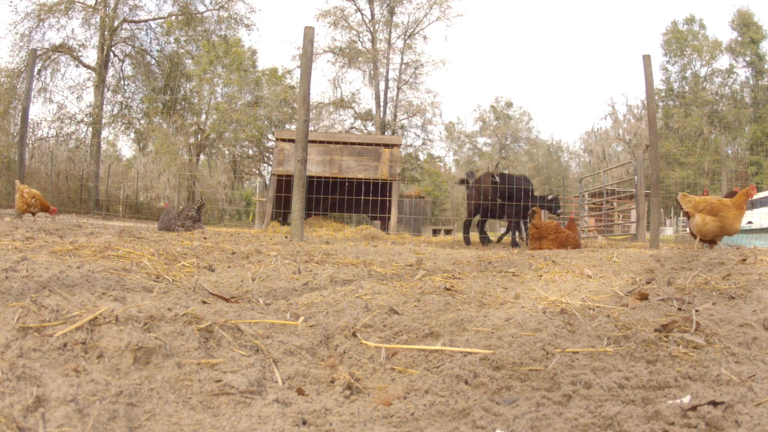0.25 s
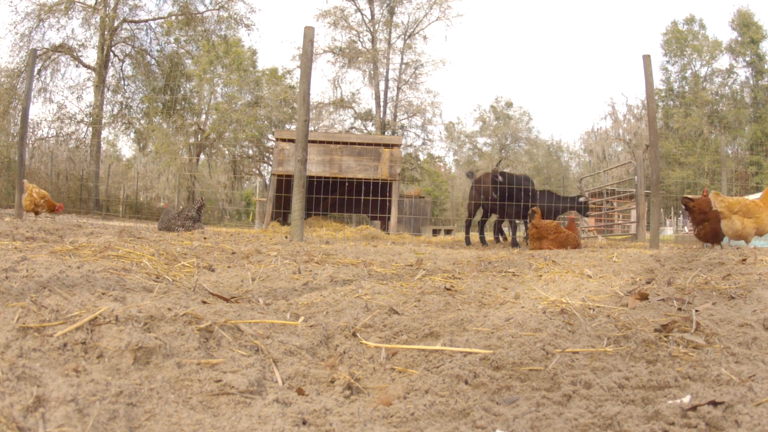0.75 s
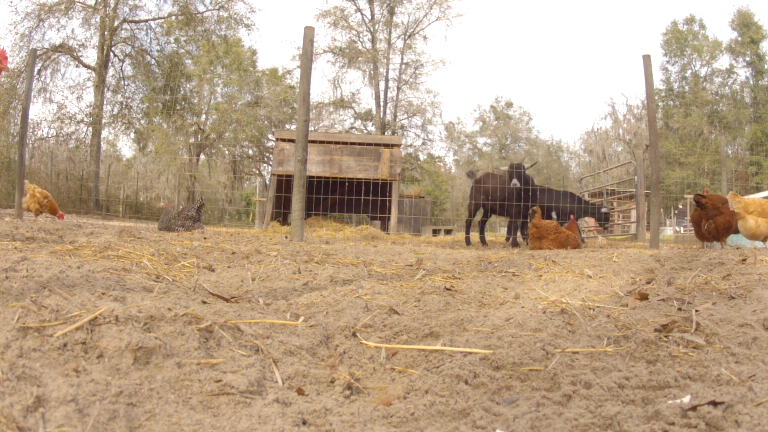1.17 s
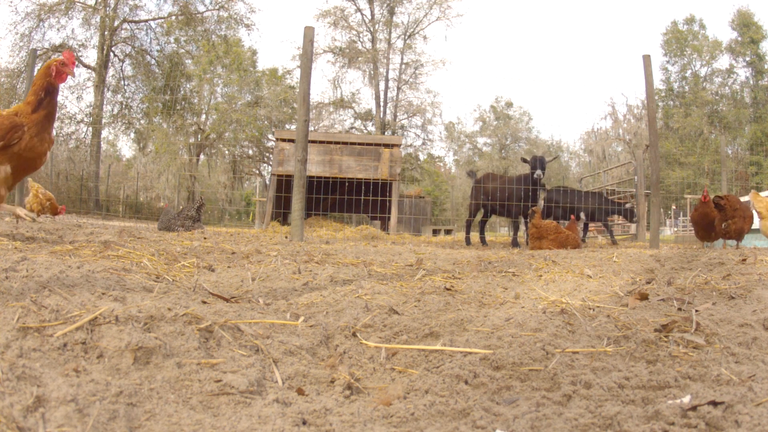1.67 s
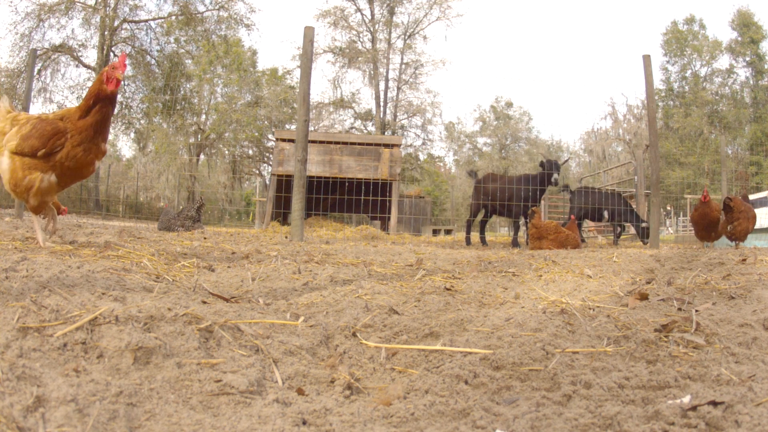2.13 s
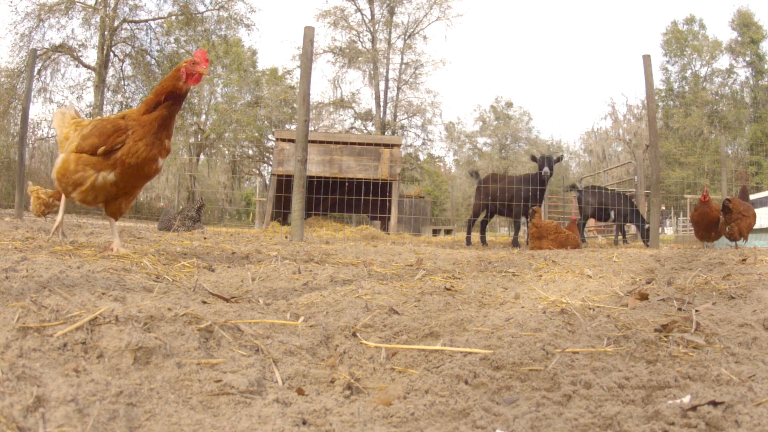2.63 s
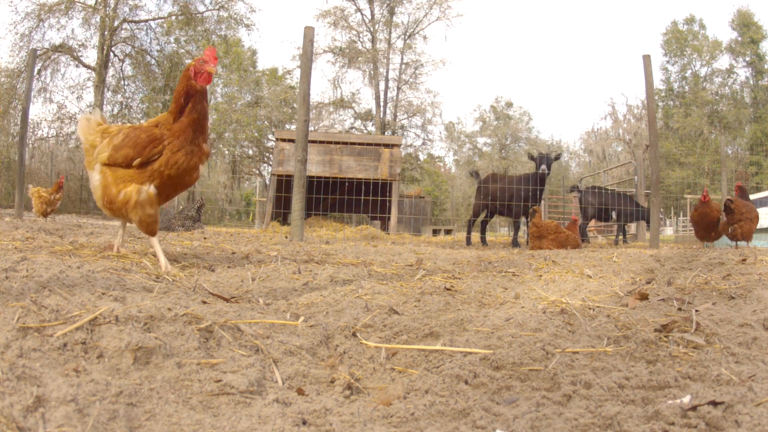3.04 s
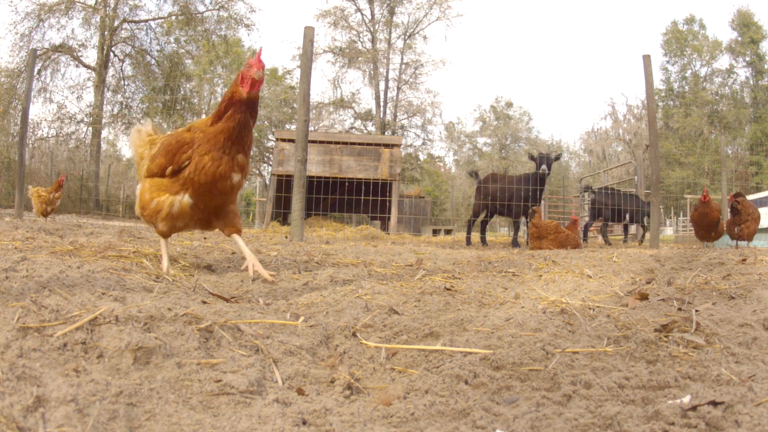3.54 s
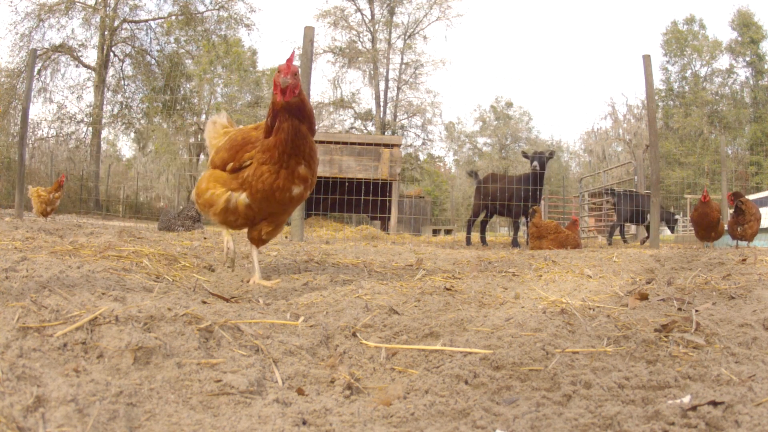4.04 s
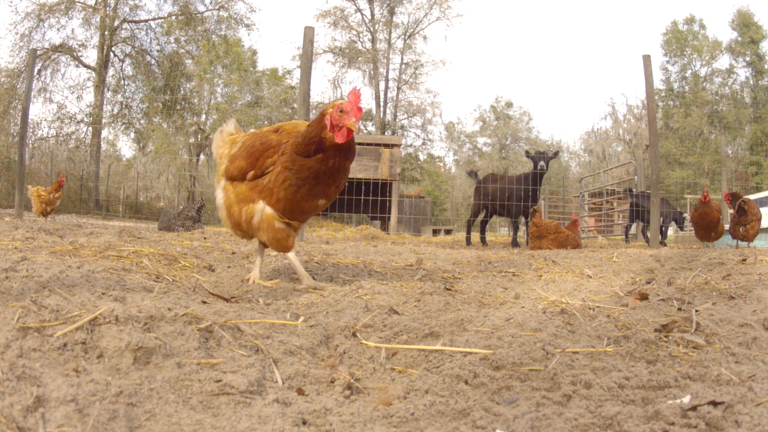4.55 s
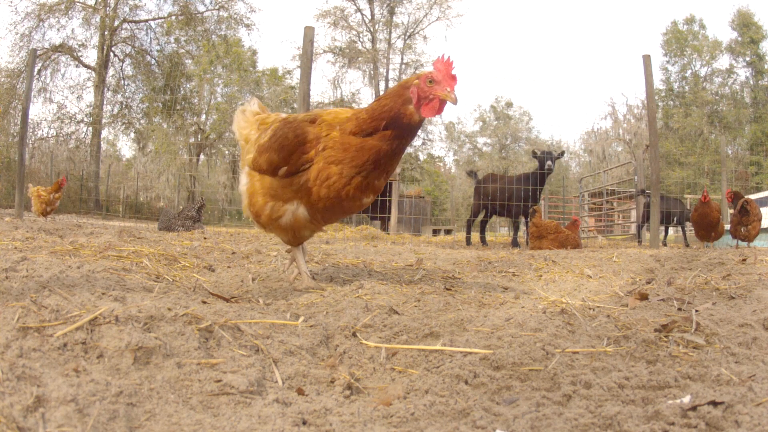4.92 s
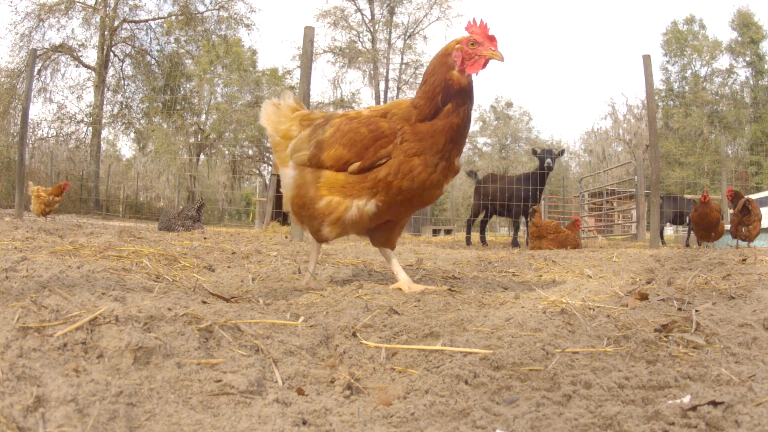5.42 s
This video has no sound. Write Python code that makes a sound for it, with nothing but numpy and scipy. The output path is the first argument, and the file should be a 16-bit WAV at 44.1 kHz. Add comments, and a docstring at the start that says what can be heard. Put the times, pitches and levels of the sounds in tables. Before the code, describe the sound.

In a farmyard, a hen draws out a raspy call, clucks several times and ends with hoarse, drawn-out croaks.

```python
"""A farmyard, where a hen gives one long rasping call, a run of short clucks, then longer croaks.
Air shakes her voice box, which slips between a clean tone, a growl (every second pulse differs) and
a chaotic rasp; her throat and beak shape the sound. Thin whines lead into some of the early calls.
Sheds and trees echo faintly over a low outdoor rumble. The recorder keeps only a narrow band and
holds each sample, which adds a thin metallic fizz."""
import sys
import numpy as np
from scipy import signal
from scipy.fft import rfft, irfft, next_fast_len
from scipy.io import wavfile
from scipy.ndimage import uniform_filter1d

SR = 44100
rng = np.random.default_rng(int(sys.argv[2]) if len(sys.argv) > 2 else 0)


def waveform_to_disk(signal):
    """Save audio, clipped to [-1, 1], as 16-bit WAV at the path in sys.argv[1]."""
    frames = np.transpose(np.atleast_2d(signal))
    scaled = np.clip(frames, -1, 1) * 32767
    samples = np.round(scaled).astype(np.int16)
    wavfile.write(sys.argv[1], SR, samples)


N = 250929


def gain_of(db):
    """Turns decibels into a number to multiply by."""
    return 10 ** (np.asarray(db) / 20)


def evened(x):
    """Scales a signal so that its average size (rms) is one."""
    return x / np.sqrt(np.mean(x ** 2) + 1e-20)


def read_curve(points, hz):
    """Reads between the rows of a (frequency, value) table, with octaves evenly spaced."""
    f, value = np.transpose(points)
    return np.interp(np.log(hz + 1), np.log(f + 1), value)


def add(mix, start, sound):
    """Lays a sound into the mix at a start time in seconds."""
    part = mix[max(round(start * SR), 0):][:len(sound)]
    part += sound[:len(part)]


def wander(size, rate_hz):
    """A smooth random wobble of average size one that moves up to about the given rate."""
    padded = next_fast_len(size + SR // 4)
    hz = np.fft.rfftfreq(padded, 1 / SR)
    spectrum = rfft(rng.standard_normal(padded)) / (1 + (hz / rate_hz) ** 4)
    return evened(irfft(spectrum, padded))[:size]


def colour(x, points, size=4096):
    """Shapes the tone by a (f/Hz, level/dB) curve; the filter rings only after a sound, not before."""
    log_gain = np.log(gain_of(read_curve(points, abs(np.fft.fftfreq(size, 1 / SR)))))
    taps = np.fft.ifft(np.exp(np.conj(signal.hilbert(log_gain)))).real
    return signal.fftconvolve(x, taps[:size // 2])[:len(x)]


def resonate(x, hz, width_hz):
    """A resonance with steep sides: lets through one band of frequencies."""
    edges = [hz - width_hz / 2, hz + width_hz / 2]
    return signal.sosfilt(signal.butter(3, edges, "band", fs=SR, output="sos"), x)


def strength(x, size):
    """How strong a signal is from moment to moment (running rms)."""
    return np.sqrt(abs(uniform_filter1d(uniform_filter1d(x ** 2, size), size)) + 1e-12)


def bumps(events, t, length_s):
    """A smooth hump centred on each (time, height) event."""
    return sum(height * np.cos(np.pi * np.clip((t - s) / length_s, -.5, .5)) ** 2 for s, height in events)


def yard(air_db=-57.42, swell_db=0.82, hum_hz=103, hum_db=-66):
    """Distant rumble and air that swell gently, with a low wavering hum."""
    # the tone of the yard's background: f/Hz, relative level/dB
    rumble_curve = [(12, -95), (20, -14), (59, -11), (98, -9.5), (138, -8.5), (200, -9.5), (218, -13),
                    (260, -20.5), (290, -15), (309, -19.5), (957, -31), (1540, -34), (2090, -35.5),
                    (2600, -36), (3600, -37), (4680, -42.5), (7920, -120)]
    hz, t = np.fft.rfftfreq(N, 1 / SR), np.arange(N) / SR
    air = evened(irfft(rfft(rng.standard_normal(N)) * gain_of(read_curve(rumble_curve, hz)), N))
    swell = evened(sum(np.sin(2 * np.pi * (f * t + rng.random())) for f in np.geomspace(.5, 14, 20)))
    hum = evened(resonate(rng.standard_normal(N), hum_hz, width_hz=8.0))
    return gain_of(air_db + swell_db * swell) * air + gain_of(hum_db) * hum


def breath(start, length, effort_db, swell_db, hz, climb_hz, release, rough, doubling, opening_db):
    """One push of air: a quick start, a swelling hold, then a fade as the pitch sags and the beak shuts."""
    attack_s, quiet_db, fade_power = 0.013, -27, 0.79
    scoop_hz, scoop_s, arch_hz, sag_hz_per_s, drift_hz = 17.4, 0.0257, 9.77, 2200, 7.5
    closed_db, open_per_db, shut_db, shut_s = -10, 0.7, -11.5, 0.025
    age = np.arange(max(-start, 0), length + release, 1 / SR)
    progress, after_s = np.minimum(age / length, 1), np.maximum(age - length, 0)
    attack_left, shut = np.maximum(1 - age / attack_s, 0), np.minimum(after_s / shut_s, 1)
    lacking_db = swell_db * (1 - progress) ** 2
    level_db = effort_db - lacking_db + quiet_db * (attack_left ** 2 + (after_s / release) ** fade_power)
    # the pitch scoops up, arches, drifts by chance, and sags once the air stops
    pitch = hz + climb_hz * (progress - .5) + arch_hz * (np.sin(np.pi * progress) - 2 / np.pi)
    pitch -= scoop_hz * np.exp(-age / scoop_s) + sag_hz_per_s * after_s
    pitch += drift_hz * wander(len(age), rate_hz=16)
    # the beak opens at the start and widens as the effort swells
    beak_db = opening_db - open_per_db * lacking_db + closed_db * attack_left + shut_db * shut
    return max(start, 0), (level_db, pitch, rough, doubling * (1 - shut), beak_db)


def voice_box(hz, rough, doubling, jitter=0.058, waver=0.0156, smear_radians=1.05, rasp=.4, leak=.2):
    """Pulses of air, strong and weak in turn, whose overtones flutter apart as the voice roughens."""
    size = len(hz)
    # roughness comes in brief fits
    rough = np.clip(rough * (1 + 0.11 * wander(size, rate_hz=25)), 0, 1)
    unsteady = 1 + waver * wander(size, rate_hz=49) + jitter * rough ** 2 * wander(size, rate_hz=262)
    cycles = np.cumsum(hz * unsteady) / SR
    pulses = np.zeros(size)
    for k in range(1, 22):
        # the lowest tones stay steadier than those above them
        flutter = smear_radians * rough * min(k / 4, 1) * wander(size, rate_hz=130)
        # period doubling: every second pulse differs, adding tones halfway between the usual ones
        weight = doubling * gain_of(-1) if k % 2 else 1
        pulses += weight * np.cos(np.pi * k * cycles + flutter)
    # rushing air escapes once a cycle; some leaks even from a clean voice
    puffs = 7 * evened(rng.standard_normal(size) * (1.3 + np.cos(2 * np.pi * cycles)))
    return pulses + (rasp * rough ** 2 + leak) * puffs


def beak_ring(source, t):
    """The beak rings in three high bands, whose balance follows how tight the throat is."""
    # beak resonances: f/Hz, width/Hz, relative level/dB with a slack throat, the same with a tight one
    bands = [(1217, 98, -13, -23), (2097, 360, -27.5, -28.5), (3136, 420, -41, -23)]
    # the throat is tight in the early calls and slack in the later croaks: t/s, tightness/0-1
    tightness = [(0, 0.6), (.7, 0.95), (1.3, 0.7), (2.1, 0.82), (2.85, 0.78), (3.2, 0.2), (3.5, 0.17),
                 (4.1, 0), (5.69, 0)]
    tension = np.interp(t, *np.transpose(tightness))
    return sum(gain_of(slack + (tight - slack) * tension) * resonate(source, hz, width)
               for hz, width, slack, tight in bands)


def hen_call(row, split_hz=600, limit_db=-43.5, flutter_db=1.08):
    """The voice box sounds through the throat; an opening beak lifts the upper part of the voice."""
    # throbs and falters of air pressure in the long calls: t/s, level change/dB
    throbs = [(.168, 5), (.212, 6), (.266, 3.5), (.38, 3.5), (.775, -2), (3.47, 0), (3.95, 1.5),
              (4.003, -4.5), (4.667, 0), (4.7, -2.5), (5.492, 3), (5.517, 0.5)]
    # brief breaks of the voice into chaos: t/s, added roughness/0-1
    breaks = [(.25, .4), (.31, .3), (.41, .3), (.51, .35), (.553, .35), (.612, .6), (.725, .5), (.835, .7),
              (.925, .6), (.975, .55), (1.01, .55), (1.04, .55), (2.87, .35), (3.15, .6), (3.465, .4),
              (3.935, .35), (4.275, .3), (4.325, .4), (4.675, .5), (5.485, .5), (5.515, .5), (5.67, .5)]
    # cracks where the pitch jumps and the period may double: t/s, added doubling/0-1, jump/Hz
    cracks = [(0.679, 0, -13.5), (0.799, .7, -28), (3.191, 0.85, 18.5), (4.04, 0.5, -7.5), (4.18, 0.2, 5.5),
              (5.01, 0, 19.5)]
    # how the throat shapes the tone: f/Hz, gain/dB
    throat = [(70, -36), (170, -13.5), (260, 6.5), (370, 6), (470, 5.5), (680, -0.5), (810, 5.5),
              (900, -3.5), (1020, -23), (1550, -30.5), (2600, -44.5), (3800, -43)]
    start, (effort_db, hz, rough, doubling, opening_db) = breath(*row)
    t = start + np.arange(len(hz)) / SR
    throb_db = bumps(throbs, t, length_s=.04)
    rough = rough + bumps(breaks, t, length_s=.05)
    hz = hz + bumps([(s, jump) for s, _, jump in cracks], t, length_s=.09)
    doubling = doubling + bumps([(s, more) for s, more, _ in cracks], t, length_s=.09)
    source = voice_box(hz, np.clip(rough, 0, 1), np.clip(doubling, 0, 1))
    voice = colour(source, throat)
    # the beak's ring stands out a little more in the quiet parts of a call
    ring = beak_ring(source, t) * gain_of(1 + 0.1 * (effort_db.max() - effort_db))
    low = signal.sosfiltfilt(signal.butter(4, split_hz, fs=SR, output="sos"), voice)
    voice = low + gain_of(opening_db + throb_db - 0.5) * (voice - low + ring)
    # air pressure sets the size of the vibration, however irregular it is
    level_db = np.minimum(effort_db + throb_db, limit_db) + flutter_db * wander(len(hz), rate_hz=45)
    return start, voice / strength(voice, size=220) * gain_of(level_db)


def echo(x, bounces_per_s=2000, delay_s=.006):
    """Sheds and trees scatter the sound into a short tail whose treble dies first."""
    # how long the echo lasts: f/Hz, time to fade by 60 dB/s
    fade_times = [(250, 0.36), (800, 0.29), (3500, 0.06)]
    size = SR // 2
    bounces = rng.standard_normal(size) * (rng.random(size) < bounces_per_s / SR)
    bounces *= np.arange(size) > delay_s * SR
    hz, t, spectrum = signal.stft(bounces, SR, nperseg=256)
    fade = gain_of(-60 * t / read_curve(fade_times, hz)[:, None])
    tail = signal.istft(spectrum * fade, SR, nperseg=256)[1]
    return signal.fftconvolve(x, tail / np.linalg.norm(tail))[:N]


def whine(start, length, level_db, top_hz, slide_hz=103, rise_s=0.0115, waver=0.0089):
    """A nearly pure tone that slides up in pitch and level as the voice box starts to vibrate."""
    overtone_db, onset_db = -32, -4
    rise_left = np.exp(-np.arange(0, length, 1 / SR) / rise_s)
    hz = top_hz - slide_hz * rise_left
    phase = 2 * np.pi * np.cumsum(hz * (1 + waver * wander(len(hz), rate_hz=55))) / SR
    tone = evened(np.sin(phase) + gain_of(overtone_db) * np.sin(2 * phase))
    return start, tone * gain_of(level_db + onset_db * rise_left) * signal.windows.tukey(len(hz), .15)


def scene(echo_db=-25):
    """The hen, her echo and the yard, the same in both channels."""
    # the hen's calls: t/s, length/s, level/dB, swell up to that level/dB, f/Hz, pitch climb/Hz, fade/s,
    # roughness (capped at 1), period doubling/0-1, lift of the upper voice by the open beak/dB
    calls = [ (-.012, 0.031, -50.5, -3, 360, 10, 0.019, 0, 0, 5.5),
             (.134, .918, -44, 10, 387.5, 8, .055, .41, 0.33, 7.5),
             (1.172, 0.19, -44.5, 0, 392.7, 17, 0.031, 0.4, 0.34, 6),
             (1.473, 0.0813, -46, 0, 403.6, 26.5, .016, 1.17, 0.7, 5.5),
             (1.677, 0.048, -45, 2.5, 366.7, -22, .02, 0.81, 0.06, 6),
             (1.877, 0.047, -45, 2, 362.7, -16, 0.019, 1, 0.23, 8.5),
             (2.103, .06, -49, -4.5, 345.7, -26.5, .025, 0.39, 0, 6),
             (2.331, 0.07, -47.5, -2, 337, -46.5, 0.014, 0.63, .15, 6),
             (2.548, 0.081, -48, 1, 339.7, -14.5, 0.019, 0.71, 0.2, 5.5),
             (2.803, 0.12, -46.5, 0, 338.3, 6, 0.023, 0.71, 0.15, 6),
             (3.117, 0.1057, -48, -1, 352.3, -5, 0.023, 0.46, 0.27, 7),
             (3.433, .236, -47.5, 3, 337.5, 49.5, .09, 0.55, 0.68, 5.5),
             (3.908, .42, -45, 7, 356.2, -3.5, .028, 0.5, 0.64, 7.5),
             (4.641, .396, -45.5, 5, 351.5, 34.5, 0.15, 0.4, 0.6, 8.5),
             (5.102, .07, -46.5, 1, 348.5, -1, 0.11, 0.5, 0.3, 6),
             (5.46, 0.21, -46, 9, 337, 14.5, 0.082, 0.37, 0.42, 7.5), ]
    # thin whines that lead into a call: t/s, length/s, level/dB, final f/Hz
    whines = [(0.019, .15, -54.5, 579), (1.152, 0.048, -55.5, 563), (1.459, 0.023, -54.5, 605),
              (1.657, 0.023, -59, 593), (1.863, 0.017, -60, 590), (2.317, 0.016, -65, 610)]
    hen = np.zeros(N)
    for row in calls:
        add(hen, *hen_call(row))
    for row in whines:
        add(hen, *whine(*row))
    mono = hen + gain_of(echo_db) * echo(hen) + yard()
    return np.array([mono, mono])


def record(dry, band_hz=3880, hold_hz=8000, hiss_db=-80, top_hz=15420):
    """A narrow-band recorder holds each sample, which mirrors the voice into the treble as a fizz."""
    narrow = signal.oaconvolve(dry, signal.firwin(101, band_hz, fs=SR)[None], "same")
    slow = signal.resample_poly(narrow, hold_hz, SR, axis=1, window=("kaiser", 3))
    held = signal.resample_poly(np.repeat(slow, 6, axis=1), SR, 6 * hold_hz, axis=1)[:, :N]
    # each channel has its own faint hiss: f/Hz, relative level/dB
    hiss_curve = [(30, 2.5), (150, 10.0), (400, -11), (2500, -2), (4200, -11), (5500, -6), (7000, -43)]
    hiss = np.array([evened(colour(noise, hiss_curve)) for noise in rng.standard_normal((2, N))])
    treble_cut = signal.firwin(1023, top_hz, window=("kaiser", 9), fs=SR)
    return signal.oaconvolve(held + gain_of(hiss_db) * hiss, treble_cut[None], "same")


dry = scene()
out = record(dry)
waveform_to_disk(out)
```